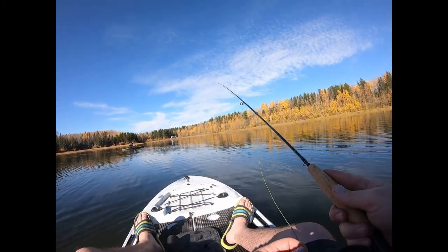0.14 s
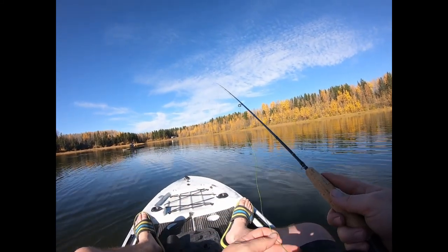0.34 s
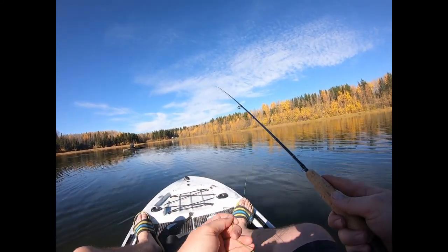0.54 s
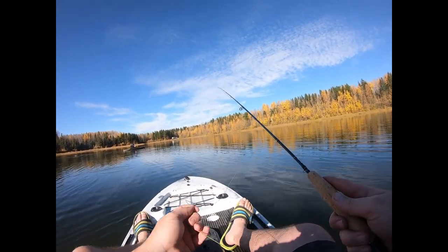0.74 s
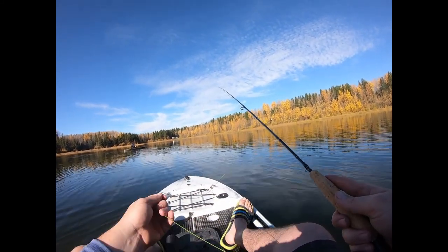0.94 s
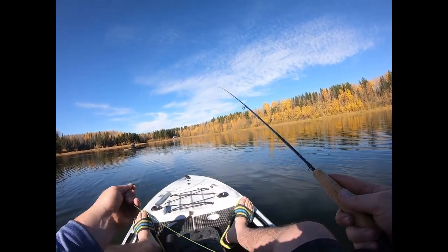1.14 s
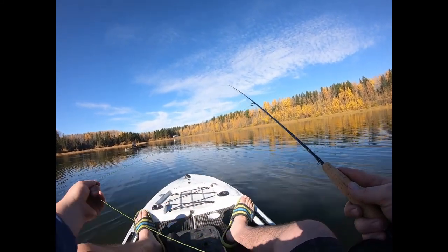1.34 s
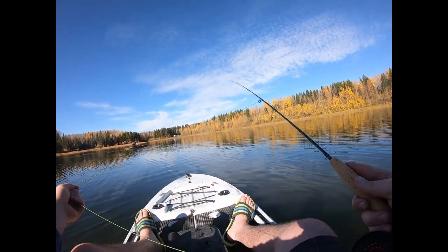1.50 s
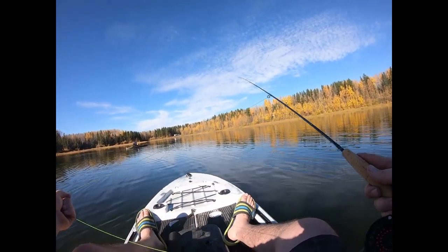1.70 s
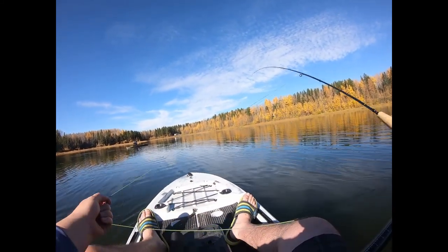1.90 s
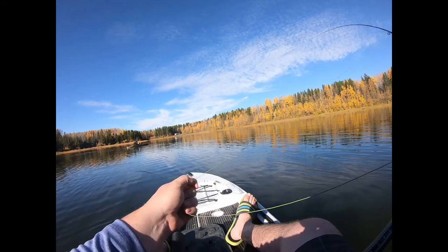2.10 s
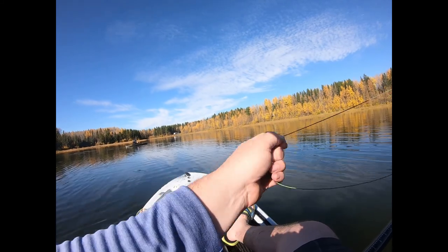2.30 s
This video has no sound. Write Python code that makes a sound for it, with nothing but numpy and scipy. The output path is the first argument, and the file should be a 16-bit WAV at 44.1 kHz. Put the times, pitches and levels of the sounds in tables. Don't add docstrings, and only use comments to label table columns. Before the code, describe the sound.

A fly reel clicks out a bright metallic ratcheting buzz in two pulls on a quiet lake

```python
import sys
import numpy as np
from scipy import signal
from scipy.fft import rfft, irfft
from scipy.io import wavfile
from scipy.ndimage import uniform_filter1d

SR = 44100
rng = np.random.default_rng(int(sys.argv[2]) if len(sys.argv) > 2 else 0)


def bounce(signal):
    frames = np.transpose(np.atleast_2d(signal))
    limited = np.clip(frames, -1, 1)
    pcm = np.round(limited * 32767).astype(np.int16)
    wavfile.write(sys.argv[1], SR, pcm)


N = 103635
RISE_S = .0014

# (time [s], snap level [dB], spool ring level [dB],
# ring left re right [dB], side modes re main mode [dB])
GRIP = [
    (.2, 2, 4.5, -17, -6.5),
    (.45, -2.5, -1.5, -18, -3),
    (.65, -1.5, 0, -25, -12),
    (1.0, -0.5, -3, -30, -11),
    (1.13, -1.5, 1.5, -8.5, -13.5),
    (1.2, -2.5, -6, -19, -0.5),
    (1.451, -3.5, -6.5, -14, -7),
    (1.63, -3, -3.5, -21.5, -17.5),
    (1.7, -0.5, -16.5, -9, 5),
    (1.81, 3.5, -13, -11, 6),
]


def gain_of(db):
    return 10 ** (np.asarray(db) / 20)


def evened(x):
    return x / np.sqrt(np.mean(x ** 2) + 1e-20)


def read(points, hz):
    f, value = np.transpose(points)
    return np.interp(np.log(hz + 1), np.log(f + 1), value)


def level_at(s, points):
    return np.interp(s, *np.transpose(points))


def left_right(left_db):
    return np.array([[left_db], [0]])


def soft_rise(t, rise_s):
    return np.sin(np.pi / 2 * np.minimum(t / rise_s, 1)) ** 2


def add(mix, s, sound):
    part = mix[:, round(s * SR):][:, :sound.shape[1]]
    part += sound[:, :part.shape[1]]


def colour(x, points, lag_s=0):
    hz = np.fft.rfftfreq(N, 1 / SR)
    response = gain_of(read(points, hz)) * np.exp(-2j * np.pi * hz * lag_s)
    return irfft(rfft(x) * response, N)


def hiss(points, same, patchy_db):
    frames, hz = N // 128 + 5, np.fft.rfftfreq(512, 1 / SR)
    a, b, c, d, patches = rng.standard_normal((frames, 257, 5)).T
    patches = uniform_filter1d(patches, size=5, axis=0)
    patches = evened(uniform_filter1d(patches, size=16, axis=1))
    same = np.clip(same * np.ones(257), -1, 1)[:, None]
    left = a + 1j * b
    right = same * left + np.sqrt(1 - same ** 2) * (c + 1j * d)
    z = np.array([left, right]) * gain_of(read(points, hz)[:, None] + patchy_db * patches)
    return evened(signal.istft(z, nperseg=512, noverlap=384)[1][:, :N])


def ring(modes, t, spread_db, wander, phase):
    hz, db, t60 = np.array(modes).T[:, :, None]
    size, pitch = rng.standard_normal((2, len(modes), 1))
    decay = gain_of(db + spread_db * size - 60 * t / t60)
    return (decay * np.sin(2 * np.pi * hz * (1 + wander * pitch) * t + phase)).sum(-2)


def knocks(rows, rise_s, rough, left_db):
    out, t = np.zeros((2, N)), np.arange(12000) / SR
    for s, db, hz, t60 in rows:
        period = int(SR / hz) + 1
        wobble = uniform_filter1d(rng.standard_normal((2, len(t))), size=period, axis=1)
        wobble = uniform_filter1d(wobble, size=period, axis=1) * np.sqrt(SR / hz)
        tone = ((1 + rough * (wobble[0] + 1j * wobble[1])) * np.exp(2j * np.pi * hz * t)).imag
        decay = gain_of(db - 60 * t / t60 + left_right(left_db))
        add(out, s, tone * soft_rise(t, rise_s) * decay)
    return out


def lake_air():
    # (frequency [Hz], level [dB per Hz])
    air_spectrum = [(12, -19), (20, -18.5), (60, -6), (100, -16.5), (160, -2.5), (283, -5), (483, -13.5),
                    (871, -11.5), (1170, -14), (3410, -31.5), (9000, -34.5), (10800, -58), (15600, -93),
                    (22000, -120)]
    # (frequency [Hz], left-right correlation)
    air_same = [(30, .2), (60, 0.3), (200, 0.16), (400, 0.12), (900, 0.067), (4000, .1)]
    same = read(air_same, np.fft.rfftfreq(512, 1 / SR))
    lift_db = np.interp(np.arange(N) / SR, [1.75, 1.85], [0, 6])
    return gain_of(-69.5 + lift_db) * hiss(air_spectrum, same, patchy_db=3)


def bumps():
    # (time [s], peak level [dB], pitch [Hz], t60 [s])
    bump_rows = [(.004, -48, 218, 0.093), (.035, -54, 287, 0.15), (.02, -57, 380, .1),
                 (.075, -54, 168, 0.086), (.15, -60.5, 176, 0.15), (.28, -61, 182, 0.11),
                 (.49, -67, 41.5, 0.2), (.592, -48.5, 202, 0.058), (.63, -55.5, 172, 0.19),
                 (.96, -63, 227, 0.16), (1.11, -60, 200, 0.15), (1.34, -60, 54.6, 0.12),
                 (1.475, -60, 205, 0.22), (1.85, -56, 192, 0.13), (1.855, -58, 46.4, 0.22),
                 (2.052, -52.5, 325, 0.11), (2.053, -42, 192.6, 0.19), (2.058, -57, 423, 0.11),
                 (2.23, -59, 331, .08), (2.056, -50.5, 104, 0.29), (2.075, -49, 46, 0.18),
                 (2.105, -43.5, 158, 0.19), (2.212, -39.5, 183, 0.066), (2.225, -34, 169.4, 0.075),
                 (2.236, -51, 50, .15), (2.275, -50, 202, 0.14), (2.31, -56, 163, 0.096)]
    return knocks(bump_rows, rise_s=.011, rough=.35, left_db=1.7)


def taps():
    # (time [s], peak level [dB], pitch [Hz], t60 [s])
    tap_rows = [(2, -44, 1500, 0.0095), (2.2965, -37, 1050, 0.026), (2.297, -44, 1250, 0.024),
                (2.2965, -46, 930, 0.027), (2.8, -50, 1900, .015), (3.1, -48, 2300, .012),
                (3.4, -48, 3200, .012), (2.243, -57, 9600, 0.011), (2.8, -56, 8400, .011),
                (1.9, -52, 7300, .011), (2.1, -72, 11700, .011), (2.1, -50, 5700, 0.033),
                (2.5, -58, 4100, .03), (2.8, -57, 6600, .03)]
    return knocks(tap_rows, rise_s=.0011, rough=.66, left_db=-13.0)


def swish():
    # (frequency [Hz], level [dB per Hz])
    swish_spectrum = [(530, -57), (900, -40), (1550, 5.5), (1720, -22), (2530, 1), (3170, 0.5), (5940, 2.5),
                      (8620, -10.5), (11500, -45), (15000, -80), (22000, -120)]
    # (time [s], level [dB])
    lift = [
        (1.78, -80),
        (1.84, -76.5),
        (1.93, -80.5),
        (2.02, -71),
        (2.13, -64.5),
        (2.24, -64),
        (2.28, -67),
        (2.35, -67),
    ]
    # (frequency [Hz], level [dB])
    line_whistles = [(6040, -16), (6500, -16.5), (8400, -25.5), (3850, -12)]
    t = np.arange(N) / SR
    level = gain_of(np.interp(t, *np.transpose(lift), left=-120) + left_right(-7) + 6)
    out = hiss([(500, -31)] + list(swish_spectrum), 0.1, patchy_db=2.5)
    for hz, db, size in [(1644, -19.5, 600)] + [(*band, 160) for band in line_whistles]:
        waver = uniform_filter1d(rng.standard_normal((2, N)), size=size, axis=1)
        waver = uniform_filter1d(waver, size=size // 2, axis=1)
        whistle = ((waver[0] + 1j * waver[1]) * np.exp(2j * np.pi * hz * t)).real
        out = out + gain_of(db) * evened(whistle)
    return level * out


def drag():
    # (time [s], level [dB])
    line_run = [
        (.3, -98),
        (.45, -55),
        (1.12, -55),
        (1.15, -72),
        (1.19, -76.5),
        (1.21, -65),
        (1.7, -56),
        (1.78, -79),
    ]
    level = gain_of(np.interp(np.arange(N) / SR, *np.transpose(line_run), left=-120, right=-120))
    rasp = [(1500, -30), (2600, -9), (4500, 0.0), (8500, -7), (10000, -6), (15000, -21), (17000, -63)]
    return level * hiss(rasp, .5, patchy_db=-2.0)


def teeth():
    # (time [s], level [dB])
    slow = [(0.2014, -4.5), (0.2199, -4), (0.238, -1.5), (0.2612, -2.5), (0.2843, -1), (0.3077, 0),
            (1.1263, -1), (1.738, -1), (1.7563, -3), (1.7783, -3), (1.8101, -5)]
    # (time [s], snap level [dB], spool ring level [dB])
    slips = [(.179, -49.5, -47), (.191, -33.5, -34), (.2575, -16, -37), (.2955, -25, -22),
             (.3833, -12, -30), (.4511, -18, -18), (1.134, -10.5, -11), (1.142, -19, -18),
             (1.171, -36, -26), (1.188, -48, -20), (1.195, -54, -33), (1.7695, -20, -12), (1.823, -27, -18)]
    # (tooth number, gap to next tooth [ms])
    pull_1 = [(0, 16.869), (4, 14.169), (14, 9.328), (25, 7.827), (27, 8.451), (35, 8.541), (39, 11.25),
              (41, 9.429), (43, 10.168), (46, 8.747), (53, 10.518), (59, 10.266), (62, 9.215), (64, 10.602),
              (71, 10.11), (76, 11.831)]
    pull_2 = [(0, 8.544), (2, 7.298), (8, 9.15), (12, 6.523), (21, 7.896), (25, 7.533), (35, 8.53),
              (39, 9.603), (44, 9.275), (49, 12.306), (52, 10.864), (57, 13.822)]
    pull_starts_s = .3264, 1.2058
    timing_s, snap_spread_db, ring_spread_db = .00025, 1.1, 1.8
    rows = [(s, db, db) for s, db in slow] + list(slips)
    for start, pull in zip(pull_starts_s, (pull_1, pull_2)):
        tooth, gap_ms = np.transpose(pull)
        gaps_ms = np.interp(np.arange(tooth[-1] + 1), tooth, gap_ms)
        times = start + np.r_[0, np.cumsum(gaps_ms)] / 1000
        late, size, rung = rng.standard_normal((len(times), 3)).T
        rows += list(zip(times + timing_s * late, snap_spread_db * size, ring_spread_db * rung))
    return rows


def grip_at(s):
    times, *columns = np.transpose(GRIP)
    return [np.interp(s, times, column) for column in columns]


def spool_rings(drops):
    spool_modes = [(2997, 0, .038), (2930, -13, .03), (2810, -7, .03), (2630, -12, .03), (2505, -16, .03),
                   (3130, -16, .02), (3290, -15, .025)]
    # (time [s], level [dB])
    hull = [
        (.2, -50),
        (.45, -46.5),
        (.55, -35.5),
        (.7, -40),
        (1.2, -39),
        (1.4, -44),
        (1.62, -35),
        (1.7, -38.5),
        (1.81, -32.5),
    ]
    out, t = np.zeros((2, N)), np.arange(2600) / SR
    rise = soft_rise(t, RISE_S)
    side_modes = (np.arange(len(spool_modes)) > 0)[:, None]
    side_column = side_modes * [0, 1, 0]
    for s, _, tone_db in drops:
        _, ring_db, left_db, side_db = grip_at(s)
        start = s - RISE_S
        slip_rad = .45 * np.array([[[2]], [[1]]]) * rng.standard_normal((2, len(spool_modes), 1))
        phase = side_modes * np.array([[[1.5]], [[0]]]) + slip_rad
        direct = ring(spool_modes + side_db * side_column, t - RISE_S, 0.32, .004, phase)
        direct_db = -26.5 + tone_db + ring_db + left_right(left_db)
        add(out, start + .000872, rise * direct * gain_of(direct_db))
        back = ring(spool_modes - 3 * side_column, t - RISE_S, 0.72, .004, phase)
        back_db = tone_db + level_at(start, hull) + left_right(-5)
        add(out, start + .0063, rise * back * gain_of(back_db))
    return out


def pawl_snaps(drops):
    # (frequency [Hz], level [dB], t60 [s])
    frame_modes = [(1123, -28.5, 0.057), (1264, -28.5, 0.059), (1560, -30, 0.049), (816, -39, 0.034),
                   (2250, -31.5, 0.037), (4230, -28, 0.027), (5150, -14, 0.0093), (5520, -13.5, 0.016),
                   (6130, -9, 0.017), (6720, -2.5, 0.0073), (7690, -6, 0.013), (8700, -17, 0.015),
                   (10070, -19.5, 0.019), (12100, -20.5, 0.016)]
    # (frequency [Hz], level [dB per Hz])
    crack_spectrum = [(2000, -26), (3400, -9), (4200, -5.5), (5440, 1.5), (8630, 3.5), (9530, -7),
                      (12000, -14.5), (15200, -24.5), (16500, -48)]
    snap_rise_s, crack_t60_s = .0018, .007
    t = np.arange(2600) / SR
    out, crack, scrape = np.zeros((2, N)), np.zeros((1, N)), np.zeros((1, N))
    chatter = soft_rise(t, snap_rise_s)
    frame_rise = chatter * gain_of(20 * np.minimum(t / snap_rise_s - 1, 0) + 3.5)
    crack_decay_db = -60 * np.maximum(t - snap_rise_s, 0) / crack_t60_s
    for s, db, _ in drops:
        snap_db = db + grip_at(s)[0]
        phase = rng.uniform(0, 2 * np.pi, (2, len(frame_modes), 1))
        rung = ring(frame_modes, t - RISE_S, 3.2, .02, phase)
        add(out, s - snap_rise_s, frame_rise * rung * gain_of(-26.5 + snap_db))
        add(crack, s - snap_rise_s, chatter[None] * gain_of(-24 + snap_db + crack_decay_db))
        add(scrape, s - RISE_S - .014, np.hanning(1400)[None] * gain_of(db))
    noise = (crack + gain_of(-62.5) * scrape ** 3) * rng.standard_normal((2, N))
    hz_db = [(1000, -23), (2500, -16.0)] + list(crack_spectrum[1:])
    return out + colour(noise, hz_db) * gain_of(5.5)


def at_ports(snap):
    # (frequency [Hz], level [dB])
    left_port = [(700, -8), (1290, -16.5), (2380, -4.5), (3450, -3.5), (4400, -10), (8120, -5),
                 (15000, 2.5)]
    apart = 0.82
    common = np.sqrt(1 - apart ** 2) * colour(snap[1], [(6000, 3.5), (13000, -5)])
    own = apart * colour(snap[0], [(6000, -0.79), (13000, 0.73)])
    left = colour(common + own, left_port, lag_s=7e-5)
    return colour(np.array([left, snap[1]]), [(200, -12.5), (600, -6), (1000, -1.5)])


def reel():
    # (delay [s], level [dB])
    echoes = [(.0022, -11.5), (.0043, -13), (.0068, -17.5), (0.0095, -25.5)]
    drops = teeth()
    spool = spool_rings(drops)
    near = at_ports(pawl_snaps(drops))
    out = near + spool
    dull = colour(near, [(5000, -4.0), (12000, -16.0)]) + 0.24 * spool
    for delay, db in echoes:
        add(out, delay, gain_of(db) * (dull + 0.38 * dull[::-1]))
    return out


def scene():
    return lake_air() + bumps() + taps() + swish() + drag() + reel()


def top_cut(x):
    return signal.sosfilt(signal.butter(12, 16990, fs=SR, output="sos"), x)


def record(dry):
    low_pass = signal.firwin(255, 16900, fs=SR)[None]
    mix = signal.oaconvolve(dry, low_pass, "same")
    return top_cut(mix)


dry = scene()
out = record(dry)
bounce(out)
```